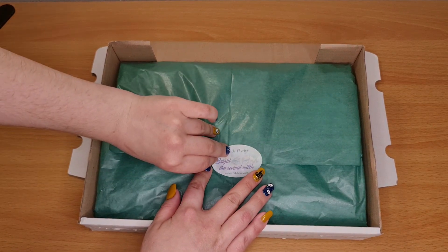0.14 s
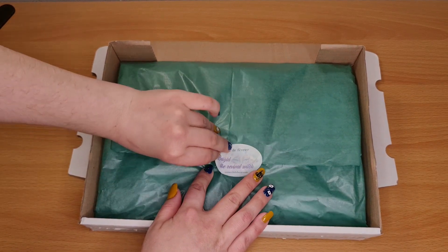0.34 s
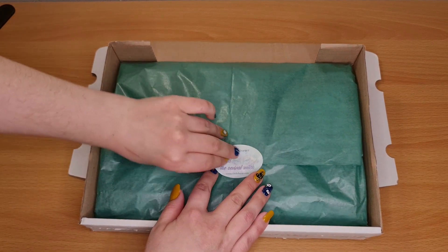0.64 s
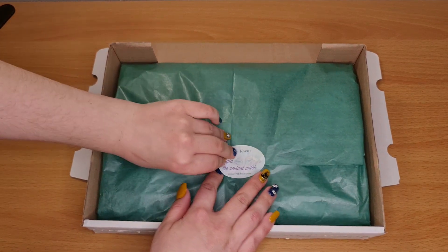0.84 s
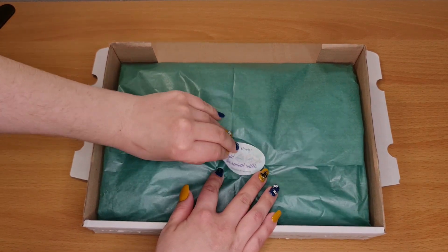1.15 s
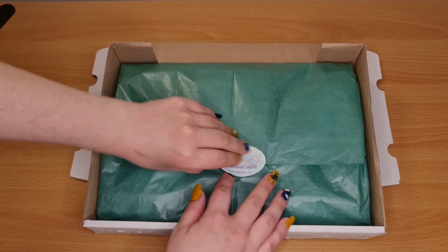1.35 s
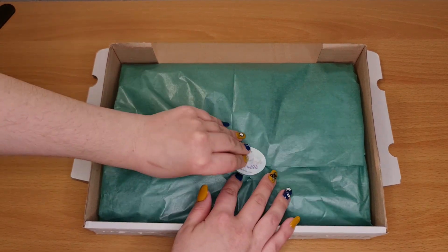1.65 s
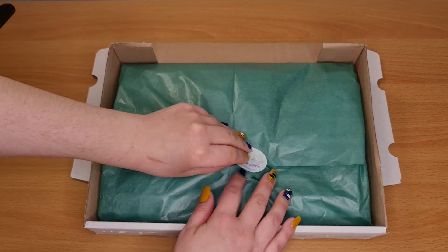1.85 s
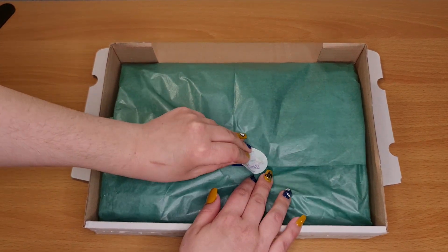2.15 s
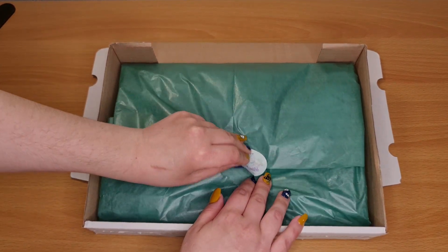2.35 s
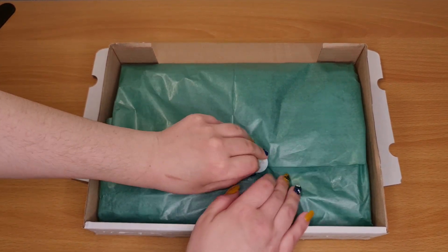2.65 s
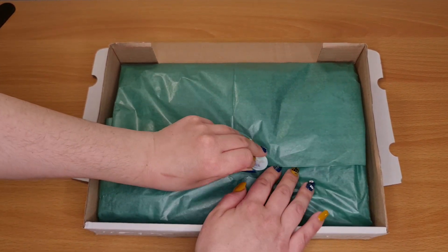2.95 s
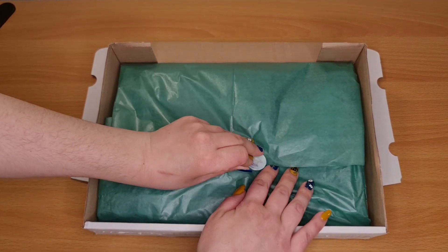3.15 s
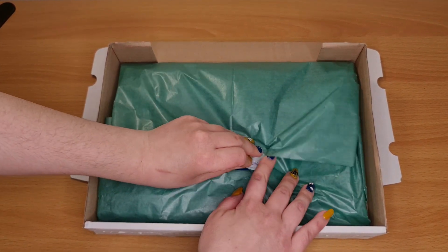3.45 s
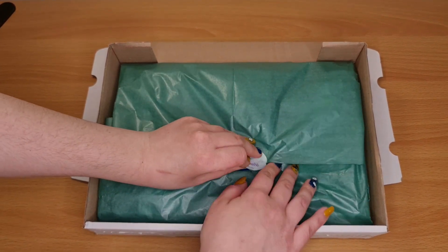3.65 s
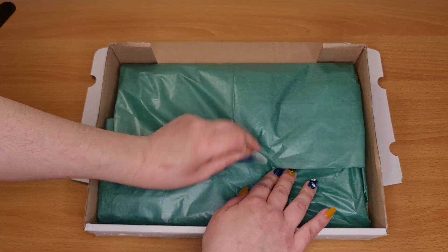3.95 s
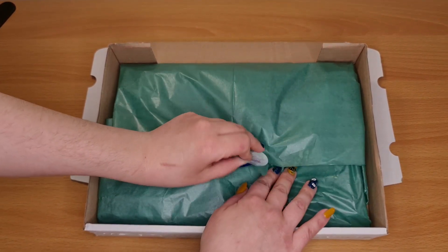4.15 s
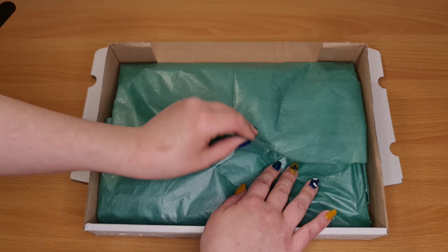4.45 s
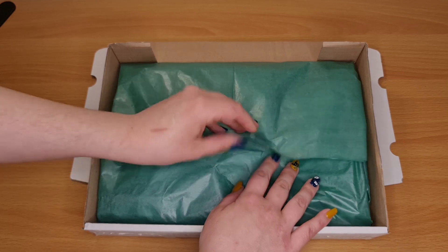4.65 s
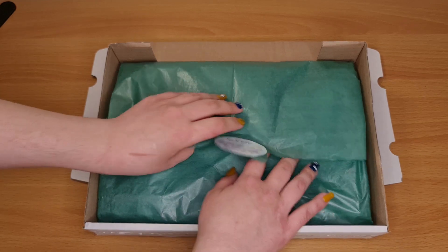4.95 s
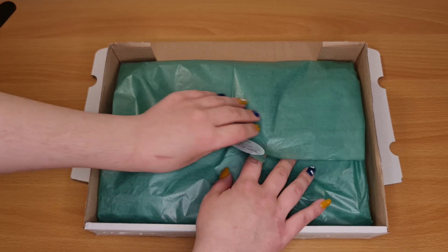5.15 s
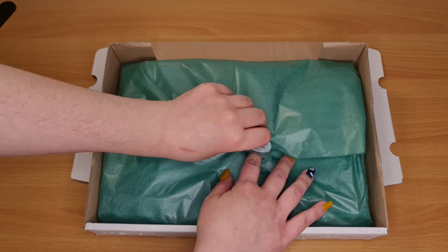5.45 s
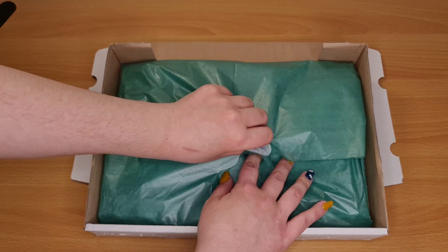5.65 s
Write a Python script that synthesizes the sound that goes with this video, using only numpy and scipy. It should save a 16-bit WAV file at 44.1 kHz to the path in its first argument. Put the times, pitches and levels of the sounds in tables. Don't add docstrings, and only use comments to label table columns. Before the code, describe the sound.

Dry, bright tissue crinkling in uneven bursts: an early hard crack with a dull cardboard knock, a denser crunchy stretch, quieter fidgety rustles, the sharpest pop as the sticker comes free, then smoothing sounds and fine ticks. Recorded close in stereo with little room echo, light boxy resonance and a faint low house rumble underneath.

```python
import sys
import numpy as np
from scipy import signal
from scipy.fft import rfft, irfft, next_fast_len
from scipy.io import wavfile
from scipy.ndimage import uniform_filter1d

SR = 44100
rng = np.random.default_rng(int(sys.argv[2]) if len(sys.argv) > 2 else 0)


def invert_db(level):
    return 10 ** (np.asarray(level, dtype=float) / 20)


def dump(signal):
    limited = np.clip(np.atleast_2d(signal).T, -1, 1)
    pcm = np.round(limited * 32767).astype(np.int16)
    wavfile.write(sys.argv[1], SR, pcm)


N = 255942
SIZE = next_fast_len(N + SR)
HZ = np.maximum(np.fft.rfftfreq(SIZE, 1 / SR), 1)

# (low edge [Hz], high edge [Hz], click rate [1/s], size spread [dB], clumping [dB])
CREASES = (5050, 23000, 7000, 1.8, 1.5)
FOLDS = (980, 4600, 6000, 1.1, 1.2)
PANELS = (54, 1040, 3500, 1.2, 1.0)
CRACKLE = (1500, 19800, 700, 1.5, 1.5)
PLEATS = (2880, 5650, 4000, 2.4, 1.2)
# (time [s], rustle level [dB], tautness as fine crease lift [dB])
HANDS = [(0.0, -51, -5), (0.7, -50, -4.2), (1.5, -52.5, -5.5), (2.3, -47, -4.5), (3.2, -48, -9.5),
         (3.5, -66, -2), (3.8, -52, -6.5), (4.05, -49.5, -3), (4.6, -51.5, -1.5), (4.9, -47.5, -4),
         (5.8, -45, -2)]
# (time [s], level [dB])
FINENESS = [(0.0, -25), (0.9, -19), (1.7, -1), (1.95, -6), (2.2, -11), (2.45, -9), (2.8, -8), (3.8, -10.5),
            (4.35, -4), (4.52, 3.5), (4.8, -9), (5.8, -11)]
# (start [s], length [s], level [dB], weight on box panels [dB])
JERKS = [(0.293, 0.056, -32.5, -8.5), (0.417, 0.033, -46, -38), (0.607, 0.006, -46.5, -6),
         (0.89, 0.024, -48.5, -12), (1.085, 0.08, -31, -5.5), (1.866, 0.037, -43.5, -19),
         (2.075, 0.079, -42.5, -8), (2.401, 0.049, -47.5, -4.5), (2.777, 0.04, -40, -10.5),
         (2.922, 0.033, -47.5, -28), (3.055, 0.065, -47.5, -13), (3.169, 0.0074, -47, -6),
         (3.347, 0.024, -43, -8), (3.89, 0.008, -45, -5.5), (3.925, 0.0053, -42.5, -9),
         (3.972, 0.059, -30.5, -7), (4.098, 0.0075, -68, 16), (4.34, 0.061, -50.5, -6.0),
         (4.97, 0.002, -58, -2), (5.262, 0.036, -52.5, -14), (5.33, 0.053, -46.5, -13),
         (5.697, 0.005, -62, 5)]
# (start [s], length [s], level [dB], weight on box panels [dB])
PULLS = [(0.0, 0.021, -46, -26), (0.166, 0.043, -49, -25), (0.288, 0.008, -46.5, -9),
         (0.527, 0.017, -41, -10.5), (0.799, 0.038, -56.5, -11), (0.945, 0.038, -40, -9),
         (1.25, 0.072, -40, -10), (1.385, 0.05, -49, -11), (1.54, 0.033, -53.5, -19),
         (1.62, 0.18, -35.5, -8.5), (1.964, 0.012, -49.5, -6), (2.189, 0.053, -43, -21),
         (2.348, 0.01, -49, -24), (2.508, 0.079, -52, -7), (2.639, 0.032, -42.5, -12),
         (2.705, 0.011, -49.5, -8), (2.848, 0.039, -47.5, -19), (2.986, 0.0047, -51.5, -3.5),
         (3.279, 0.052, -48, -9.5), (3.401, 0.078, -40.5, -9), (3.521, 0.067, -45, -7),
         (3.629, 0.17, -45, -7.5), (3.842, 0.016, -43.5, -9), (4.235, 0.099, -56.5, -2.5),
         (4.44, 0.12, -41, -6.5), (4.505, 0.074, -53, -11), (4.679, 0.073, -54, -4.5),
         (4.822, 0.04, -50.5, -6.5), (5.051, 0.17, -55.5, -9), (5.39, 0.14, -47, -6.5),
         (5.619, 0.02, -46.5, -4.5), (5.783, 0.05, -35.5, -7.5)]
# (time [s], level [dB], half length [ms])
RIPS = [(1.692, -29, 2.7), (1.772, -50, 1.7), (3.102, -45, 5), (3.443, -35, 5.4), (3.473, -38, 6.2),
        (3.556, -35.5, 10), (3.974, -22.5, 5.2), (0.3, -51, 2.7), (4.975, -46, 3.2), (5.459, -36, 8.7),
        (5.515, -47, 11), (5.562, -34.5, 18)]
# (time [s], level [dB])
RUMBLE_LEVEL = [(0.0, -61), (1.7, -61.5), (2.4, -58.5), (3.1, -61), (3.6, -57.5), (4.2, -60), (5.8, -59)]
# (frequency [Hz], level [dB])
RUMBLE_COLOUR = [(15, -16), (28, -19), (42, 8.5), (53, 12), (62, 2.5), (90, 3.5), (115, -10.5), (160, -8.5),
                 (240, -14.5), (500, -31)]
# (time [s], peak [dB], body under treble
# [dB])
WRINKLE_CRACKS = [(0.1136, -29.5, -8), (0.1461, -28, -12), (0.1471, -31, -9), (0.1805, -23, -14),
                  (0.1915, -29, -14), (0.2239, -29, -9), (0.2648, -30, -9), (0.2793, -25, -9),
                  (0.2857, -22, -5), (0.2964, -7.5, -7), (0.307, -20, -3), (0.4189, -29, -10),
                  (0.4334, -20, -16), (0.4778, -27, -18), (0.5003, -26, -11), (0.5092, -28, 0),
                  (0.5222, -35, -7), (0.607, -29, -18), (0.6569, -44, -12), (0.6664, -41, -7),
                  (0.6973, -43, -12), (0.7372, -35, -14), (0.7552, -32, -7), (0.8046, -30, -13),
                  (0.8694, -39, 3), (0.8849, -35, -10), (0.8909, -25, -11), (0.9088, -29, -8),
                  (0.9358, -20, -18), (0.9772, -31, -11), (1.0526, -28, -11), (1.0825, -28, 2),
                  (1.088, -32, -11), (1.1025, -15, -12), (1.1298, -15, -3), (1.1717, -17.5, -13),
                  (1.2231, -36, -8), (1.2436, -35, -12), (1.254, -36, -7), (1.283, -21, 0),
                  (1.3209, -37, -11), (1.3623, -29, -19), (1.4391, -30, -8), (1.5, -39, -5),
                  (1.5269, -36, -3), (1.5419, -40, -6), (1.5658, -23, -3), (1.5993, -18, -2),
                  (1.6197, -27, -3), (1.6452, -24, -6), (1.6318, -21, 4), (1.6812, -21, 5),
                  (1.7155, -27, -12), (1.7429, -18, -2), (1.7592, -23, 2), (1.7873, -27, -6),
                  (1.7998, -21, -4), (1.8542, -37, -7), (1.8706, -28, -12), (1.9006, -35, -14),
                  (1.9003, -25, -18), (1.9512, -37, -7), (1.9826, -26.5, -10), (2.0146, -45, -5),
                  (2.041, -36, -8), (2.0739, -28, -9), (2.1039, -25, -4), (2.18, -37, -10),
                  (2.2153, -31, 9), (2.2845, -27, -4), (2.3194, -29, -16), (2.3388, -34, -9),
                  (2.3526, -25, -17), (2.3902, -34, -5), (2.402, -27, -16), (2.487, -36, -7),
                  (2.551, -28, -11), (2.6167, -35, -1), (2.6272, -39, -6), (2.6387, -41, -11),
                  (2.66, -31, 7), (2.7594, -32, -6), (2.7709, -33, -12), (2.784, -35, 0), (2.795, -36, -5),
                  (2.863, -25, -12), (2.923, -45, -3), (2.947, -31, -8), (2.9799, -39, -11),
                  (3.0197, -28, -13), (3.0392, -34, -5), (3.0557, -33, -8), (3.0754, -35, -7),
                  (3.1011, -37, -7), (2.4085, -24, -8), (3.167, -29, -12), (3.2433, -33, -15),
                  (3.2692, -29, -6), (2.2645, -35, -14), (3.3205, -28, -11), (4.5, -22, -10),
                  (3.35, -23, -11), (3.403, -22, -1), (3.4374, -26, -12), (3.4393, -24, -16),
                  (3.4688, -24, -11), (3.5126, -19, -18), (3.5246, -28, -18), (3.5411, -28, -12),
                  (3.5496, -22, -14), (3.624, -33, -4), (3.7545, -38, 10), (3.7656, -41, -2),
                  (3.8145, -36, -7), (3.827, -37, -13), (3.842, -24, -11), (3.8474, -24, -12),
                  (3.8915, -35, -7), (3.925, -26, -4), (3.969, -10, -6),
                  (3.9707, -22, -6), (3.9738, -23, -5), (4.088, -37, -9), (4.105, -27, -8),
                    (4.1255, -31, -8), (4.1459, -41, -10), (4.1768, -38, -5), (4.1968, -32, -12),
                    (4.2267, -39, -6), (4.2482, -43, -7), (4.3001, -29, -1), (4.3405, -29, -12),
                    (4.3599, -28, -15), (4.4293, -35, -12), (4.4447, -23, -14), (4.4647, -18, -9),
                    (4.4836, -21, -12), (4.548, -18, -18), (4.6288, -42, -9), (4.6428, -41, 2),
                    (4.6996, -33, -8), (4.7236, -30, -8), (4.8084, -31, -3), (4.9685, -41, -11),
                    (4.975, -29, 0), (5.0124, -42, -3), (5.0279, -39, -10), (5.0464, -29, -7),
                    (5.0668, -31, -12), (5.1247, -41, -10), (5.152, -25, -8), (5.2324, -35, -8),
                    (5.2609, -23, -14), (5.3287, -40, -6), (5.3432, -32, -7), (5.3931, -35, -13),
                    (5.433, -32, -12), (5.4569, -20, -1), (5.4904, -25, -15), (5.5108, -32, -6),
                    (5.5602, -17, -21), (5.6091, -34, -10), (5.6201, -24, -9), (5.6977, -22, -7),
                    (5.7273, -31, -14), (5.7483, -19, -5), (5.7857, -27, -9),
                  (0.2729, -32, -2), (1.6594, -28, 0), (1.6901, -25, -8), (1.7023, -22, 5),
                  (1.7254, -24, -7), (1.7364, -29, -8), (1.7702, -21, 6), (1.8124, -27, -6),
                  (4.2104, -45, -4), (4.3514, -31, -13), (4.4514, -33, -10), (4.4737, -26, -9),
                  (4.5094, -23, -17), (4.5256, -16, -16), (4.578, -21, -11)]
# (time [s], peak [dB], ring [Hz], wide crack [dB])
BROAD_SNAPS = [(0.182, -25, 1300, -13), (0.285, -23, 1310, -2), (0.298, -19, 640, -10),
               (0.3006, -21, 1960, -1), (0.4164, -37, 1680, -4), (0.434, -22, 2010, 0),
               (0.522, -32, 1290, 2), (0.606, -35, 1260, -2), (0.6555, -41, 1540, 14),
               (0.8846, -34, 1740, 7), (1.0814, -18, 3100, -3), (1.108, -13, 1310, -4),
               (1.1404, -20, 1440, 0), (1.69, -17, 685, -8), (1.716, -22.5, 665, -8),
               (1.8009, -20, 2010, 2), (1.856, -32, 1260, 3), (1.8, -24, 720, -11), (2.3207, -36, 1750, 5),
               (2.353, -44, 1760, 6), (2.4029, -41, 1750, 18.5), (2.783, -27, 1860, 2),
               (2.798, -27, 1640, 6), (2.98, -39.5, 1550, 18), (3.0763, -22.5, 1190, 4),
               (3.4012, -40, 1790, 6), (3.925, -21, 1600, 5.5), (4.1055, -36.5, 1490, 13.5),
               (5.3956, -29.5, 1530, 1), (5.558, -21, 372, -10), (5.605, -23, 466, -10)]
# (time [s], peak [dB], ring [Hz], wide crack [dB])
MIDDLE_SNAPS = [(0.1914, -35, 3810, 1), (0.6666, -38.5, 2390, 14.5), (0.8038, -31, 4770, 6),
                (0.9348, -40, 3160, 13), (1.0524, -37, 3680, 8), (1.5, -36.5, 2790, 12.5),
                (1.5419, -29, 2720, 7), (1.5667, -26.5, 4070, 5), (1.63, -25, 2800, 2),
                (1.6806, -22.5, 3170, 8), (1.7157, -20, 3200, 11.5), (1.7416, -17, 3070, -5),
                (1.7584, -17, 4570, -15), (2.1797, -34, 2860, 8), (2.215, -23, 2400, -3),
                (2.626, -23, 2930, -6), (2.647, -22.5, 2820, -6), (2.9203, -22, 3450, -4),
                (3.0525, -25, 4930, 0), (3.0974, -25, 3060, -6), (3.1842, -35, 2670, 10.5),
                (3.5493, -22.5, 2560, -13), (3.7662, -29, 2720, 8), (3.84, -36, 2660, 10),
                (3.8901, -23, 2800, 0), (4.2268, -30, 2950, -12), (4.4826, -28, 2820, 2),
                (4.9684, -39, 2830, 10), (5.1504, -37, 2840, 7), (5.5593, -42, 2740, -3)]
# (time [s], peak [dB], ring [Hz], left over right
# [dB])
FINE_SNAPS = [(0.267, -36, 8790, -5), (0.477, -32, 8750, 3), (0.698, -36, 6200, -1.5),
              (0.7552, -34, 6900, 0), (1.152, -22, 6360, -6), (1.1585, -22, 6400, -3),
              (1.256, -25, 6150, -7), (1.283, -26, 6160, -7), (1.441, -33, 6420, -1), (1.6, -17.5, 6430, 2),
              (1.621, -21, 6400, -3), (1.6444, -19, 6860, 10), (2.2152, -23.5, 6800, -16),
              (2.424, -26.5, 6170, 0), (3.167, -24.5, 7000, -1), (3.4376, -33, 6320, 3),
              (3.451, -27, 6400, -2), (3.5034, -26, 7060, 4), (3.5078, -23, 6900, -1),
              (3.5235, -25, 6400, -6), (3.89, -29, 6290, -11), (3.9685, -3, 6230, -7.5),
              (3.9719, -16, 6900, -7), (4.012, -12, 6200, -2), (4.1258, -26, 6500, -1),
              (4.1967, -28, 8500, -3), (4.341, -27, 8880, 1), (4.351, -26, 6230, -8),
              (4.4295, -28, 5800, -0.5), (4.546, -24, 7620, 7),
              (5.047, -34, 7850, 4), (5.2605, -23, 7400, -3), (5.453, -30, 6100, 8), (5.51, -17, 12400, 5),
              (5.5304, -27, 6540, 2.0), (5.5394, -25, 6420, -3), (5.621, -32, 7170, -2),
              (5.6978, -25, 7900, 2), (5.707, -40, 7170, -2), (5.728, -38, 6980, 3), (5.7486, -38, 5950, 5),
              (5.7697, -23, 6440, -4), (5.784, -29, 6500, -1.0)]
# (time [s], level [dB], pitch [Hz], T60 [s])
TEARS = [
    (0.295, -45.5, 288, 0.23),
    (1.08, -53, 162, 0.14),
    (1.083, -30, 486, 0.08),
    (3.973, -52, 174, 0.21),
]
# (frequency [Hz], width [Hz], left lift [dB], right lift [dB])
BOX_AIR = (659, 44.3, 14.5, 7), (1640, 210, 6, 1.5), (2800, 550, 1.5, 3), (6430, 1270, -1.5, 5.5)
# (frequency [Hz], level [dB])
LEFT_COLOUR = [(120, -21), (250, -1.5), (480, 6), (670, -1), (850, 4.5), (1080, -3.5), (1400, 1.5),
               (2200, 3.5), (4600, 2.5), (6300, 8), (8600, 7.5), (10000, 1), (14000, 3), (16000, -6.5)]
# (frequency [Hz], level [dB])
RIGHT_COLOUR = [(120, -15), (250, -5.5), (420, 0.5), (900, 0), (1300, 6.5), (1900, 5), (2300, 3),
                (4800, 3.5), (6000, 3.5), (6900, 5), (7900, 1), (11000, 3.5), (14000, -1.5), (16000, 6)]

# (rise [dB/s], sag [dB/s], fall [dB/s])
JERK_SLOPES, PULL_SLOPES = (1440, 92, 480), (340, 17, 490)
PLACES = 12
SCATTER_MS, DIRECT_DB = 2.6, 15.5
ROOM_T60_S, ROOM_DB, SNAP_ROOM_DB = 0.25, -22.0, -42.0
BURST_ALIKE = 0.14
CRACK_MS, CRACK_RISE_MS, CRACK_SPLIT_HZ, CRACK_LOW_HZ = 1.36, 0.075, 6600, 900
CRACK_DB, CRACK_BODY_DB = 0.5, -3
SNAP_MS, SNAP_RISE_MS, SNAP_DB = 1.2, 0.21, -28.5
FOLD_LIFT_DB, FINE_CRACK_DB = 1.5, 3
RING_GAIN = 0.2
ALIKE_BELOW_HZ = 330
CEILING = 0.9


def rms_one(x):
    return x / np.sqrt(np.mean(x ** 2) + 1e-20)


def in_time(rows):
    s, *columns = np.transpose(rows)
    return [np.interp(np.arange(N) / SR, s, c) for c in columns]


def drift(rate_hz):
    r = np.exp(-2 * np.pi * rate_hz / SR)
    noise = rng.standard_normal(N + SR)
    return rms_one(signal.lfilter([1], [1, -2 * r, r * r], noise)[SR:])


def causal_colour(points):
    hz, level_db = np.transpose(points)
    curve_db = np.interp(np.log(HZ), np.log(hz), level_db)
    cepstrum = irfft(np.log(invert_db(curve_db)), SIZE)
    cepstrum[1:SIZE // 2] *= 2
    cepstrum[SIZE // 2 + 1:] = 0
    return np.exp(rfft(cepstrum))


def motions(rows, slopes):
    s, length, level_db, weight_db = np.transpose(rows)[:, :, None]
    rise, sag, fall = slopes
    hop = 32
    age = np.arange(0, N + hop, hop) / SR - s
    rising_db = rise * np.minimum(age, 0)
    sagging_db = sag * np.clip(age, 0, length)
    falling_db = fall * np.maximum(age - length, 0)
    shape = invert_db(level_db + rising_db - sagging_db - falling_db)
    sheet = shape.sum(axis=0)
    panels = (shape * invert_db(weight_db)).sum(axis=0)
    return np.repeat([sheet, panels], hop, axis=1)[:, :N]


def effort():
    t = np.arange(N) / SR
    rest_db, taut_db = in_time(HANDS)
    fine_db, = in_time(FINENESS)
    resting = invert_db(rest_db + [[0], [-9]])
    folds, panels = motions(JERKS, JERK_SLOPES) + motions(PULLS, PULL_SLOPES) + resting
    rips = sum(invert_db(rip_db) * np.exp(-(1000 * (t - s) / half_ms) ** 2) for s, rip_db, half_ms in RIPS)
    sharpening = (folds / invert_db(-55.0)) ** 0.25
    creases = folds * invert_db(taut_db) * sharpening + rips
    broad = invert_db(-0.061 * (fine_db - fine_db.mean()))
    levels = np.array([creases, folds * broad, panels * broad, creases, folds * invert_db(fine_db)])
    makeup_db = np.array([[-0.5], [2.5], [12.0], [-4.0], [3.0]])
    return levels * invert_db(makeup_db)


def buckling(kind, level, strain):
    low_hz, high_hz, per_s, spread_db, clump_db = kind
    sizes = invert_db(spread_db * np.minimum(rng.exponential(1, N), 6)) * rng.choice([-1, 1], N)
    born = rng.random(N) < per_s / SR
    clicks = sizes * born * invert_db(clump_db * strain)
    clicks /= np.sqrt(np.abs(uniform_filter1d(clicks ** 2, size=SR // 30)) + 1e-6)
    band = signal.butter(2, [low_hz, min(high_hz, 0.45 * SR)], "band", fs=SR, output="sos")
    return clicks * level, band


def path(length_s=0.4):
    t = np.arange(int(length_s * SR)) / SR
    decay = np.exp(-1000 * t / SCATTER_MS) + invert_db(ROOM_DB - 60 * t / ROOM_T60_S)
    response = decay * rng.standard_normal((2, len(t)))
    response[:, 0] = invert_db(DIRECT_DB)
    response[1] = np.roll(response[1], rng.integers(0, 6))
    return response / np.sqrt(np.sum(response ** 2, axis=1, keepdims=True))


def rustle():
    strain = 0.3 * drift(40) + 0.9 * drift(150)
    place = np.repeat(rng.integers(0, PLACES, N // 120 + 1), 600)[:N]
    kinds = (CREASES, FOLDS, PANELS, CRACKLE, PLEATS)
    buckles = [buckling(kind, level, strain) for kind, level in zip(kinds, effort())]
    out = 0
    for k in range(PLACES):
        here = sum(signal.sosfilt(band, clicks * (place == k) + 1e-18) for clicks, band in buckles)
        out = out + rfft(here, SIZE) * rfft(path(), SIZE)
    return out


def rumble(alike=0.93):
    colour = causal_colour(RUMBLE_COLOUR)
    mid, side = (rms_one(irfft(rfft(rng.standard_normal(SIZE)) * colour, SIZE)[:N]) for _ in range(2))
    both = np.sqrt(alike) * mid + np.sqrt(1 - alike) * side * [[1], [-1]]
    return invert_db(in_time(RUMBLE_LEVEL)[0]) * both


def cracks():
    out, ms = np.zeros((2, SIZE)), 1000 * np.arange(SR // 100) / SR
    rows = WRINKLE_CRACKS
    noise = rng.standard_normal((len(rows), 2, len(ms)))
    envelope = np.exp(-ms / CRACK_MS) * (1 - np.exp(-ms / CRACK_RISE_MS))
    bursts = (BURST_ALIKE * noise[:, :1] + (1 - BURST_ALIKE) * noise) * envelope
    high = signal.butter(2, CRACK_SPLIT_HZ, "high", fs=SR, output="sos")
    middle = signal.butter(1, [CRACK_LOW_HZ, CRACK_SPLIT_HZ], "band", fs=SR, output="sos")
    treble, body = signal.sosfilt(high, bursts), signal.sosfilt(middle, bursts)
    for (s, peak_db, body_db), top, low in zip(rows, treble, body):
        at = round(s * SR)
        sound = top / np.abs(top).max() + invert_db(body_db + CRACK_BODY_DB) * low / np.abs(low).max()
        out[:, at:at + len(ms)] += invert_db(peak_db + CRACK_DB) * sound
    return rfft(out)


def snaps():
    out, t = np.zeros((2, SIZE)), np.arange(SR // 40) / SR
    rows = [(s, db + FOLD_LIFT_DB, hz, 0, crack_db) for s, db, hz, crack_db in BROAD_SNAPS + MIDDLE_SNAPS]
    for s, db, hz, pan_db in FINE_SNAPS:
        rows.append((s, db, hz, pan_db, FINE_CRACK_DB - RING_GAIN * (db + 38)))
    envelope = np.exp(-1000 * t / SNAP_MS) * (1 - np.exp(-1000 * t / SNAP_RISE_MS))
    noise = rng.standard_normal((len(rows), 2, len(t)))
    for (s, peak_db, hz, pan_db, crack_db), burst in zip(rows, noise):
        burst = (BURST_ALIKE * burst[0] + (1 - BURST_ALIKE) * burst) * envelope
        band = signal.butter(1, [hz / 1.07, min(hz * 1.06, 0.45 * SR)], "band", fs=SR, output="sos")
        ring = signal.sosfilt(band, burst)
        sound = rms_one(ring) + invert_db(crack_db) * rms_one(burst)
        side_db = pan_db * np.array([[0.5], [-0.5]])
        at = round(s * SR)
        out[:, at:at + len(t)] += invert_db(peak_db + SNAP_DB + side_db) * sound
    tail = np.arange(SR // 3) / SR
    room = invert_db(SNAP_ROOM_DB - 60 * tail / ROOM_T60_S) * rng.standard_normal((2, len(tail)))
    return rfft(out) * (1 + rfft(room, SIZE))


def thumps():
    t, out = np.arange(N) / SR, 0
    for s, level_db, hz, t60_s in TEARS:
        age = np.maximum(t - s, 0)
        out = out + invert_db(level_db - 60 * age / t60_s) * np.sin(2 * np.pi * hz * age)
    return out


def box_air():
    response = 1
    for hz, width_hz, *lift_db in BOX_AIR:
        resonance = 1 / (1 + 1j * (HZ ** 2 - hz ** 2) / (HZ * width_hz))
        response = response + (invert_db(lift_db)[:, None] - 1) * resonance
    return response


def scene():
    paper = rustle() + cracks() + snaps()
    mid = paper.mean(axis=0)
    paper = mid + (paper - mid) * 1j * HZ / (ALIKE_BELOW_HZ + 1j * HZ)
    colour = np.array([causal_colour(LEFT_COLOUR), causal_colour(RIGHT_COLOUR)]) * box_air()
    return irfft(paper * colour, SIZE)[:, :N] + thumps() + rumble()


def band_limit(x):
    return signal.sosfilt(signal.butter(12, 16990, fs=SR, output="sos"), x)


def record(dry):
    rounded = CEILING * np.tanh(dry / CEILING)
    return band_limit(rounded)


dry = scene()
out = record(dry)
dump(out)
```